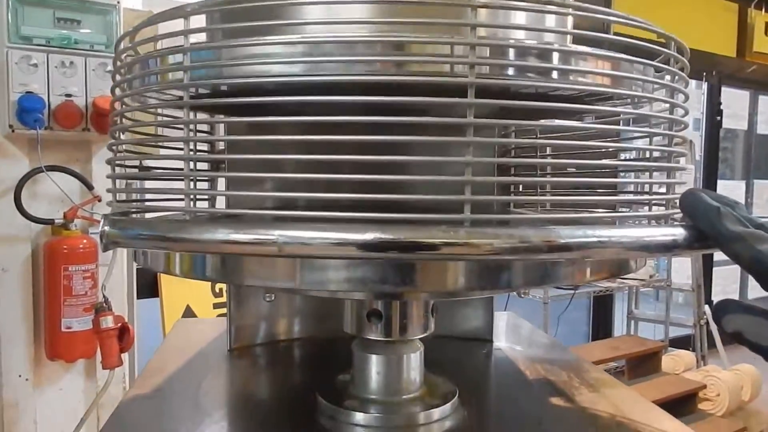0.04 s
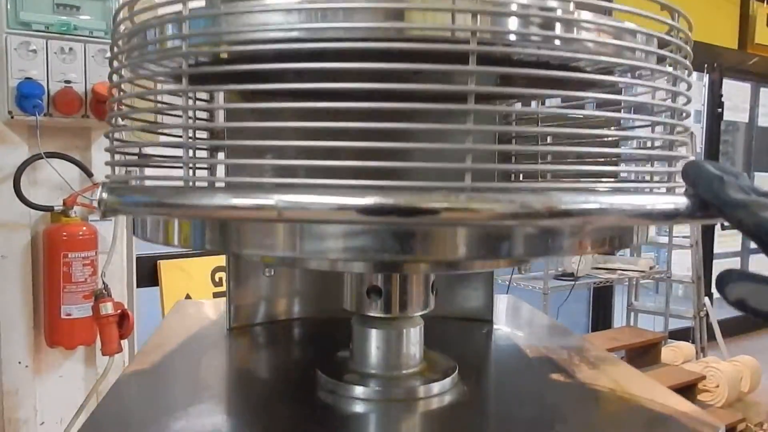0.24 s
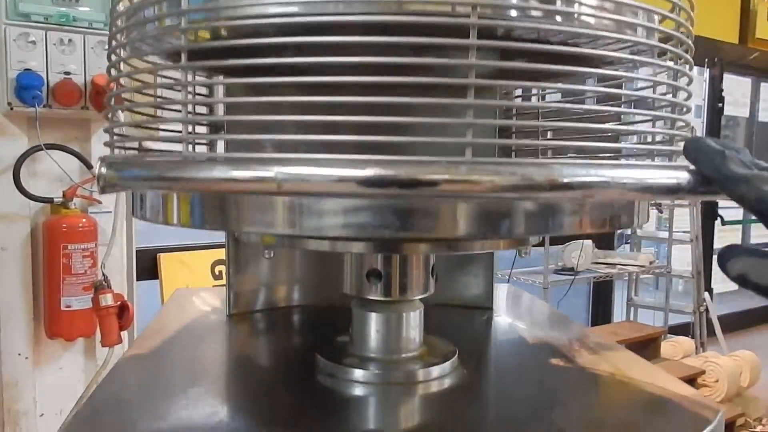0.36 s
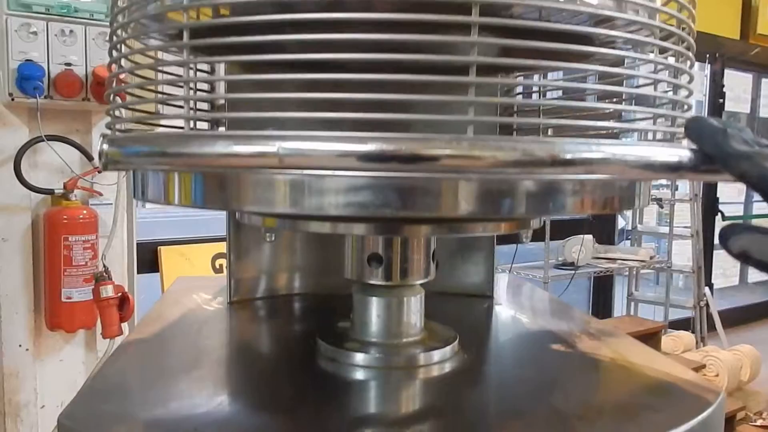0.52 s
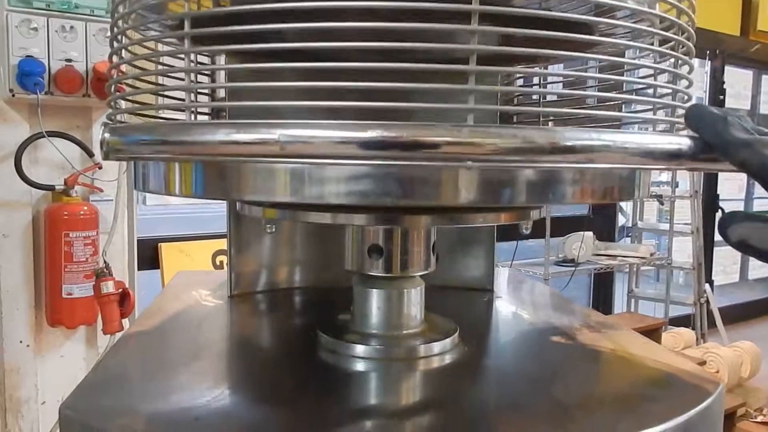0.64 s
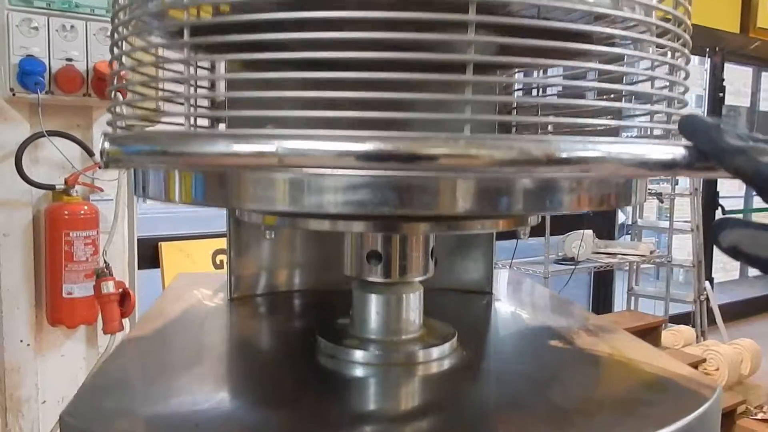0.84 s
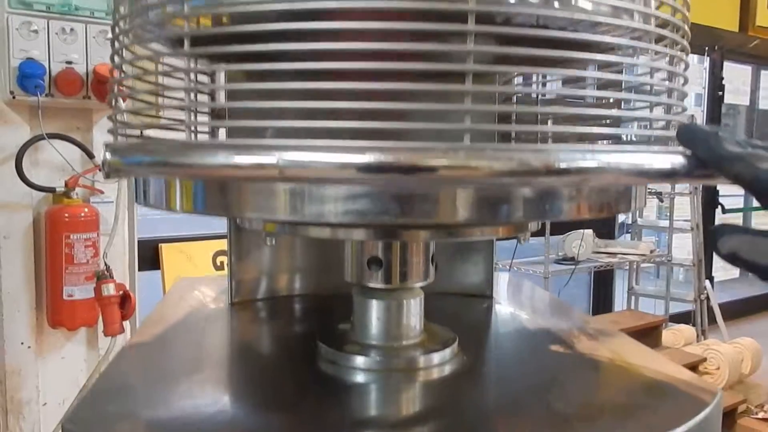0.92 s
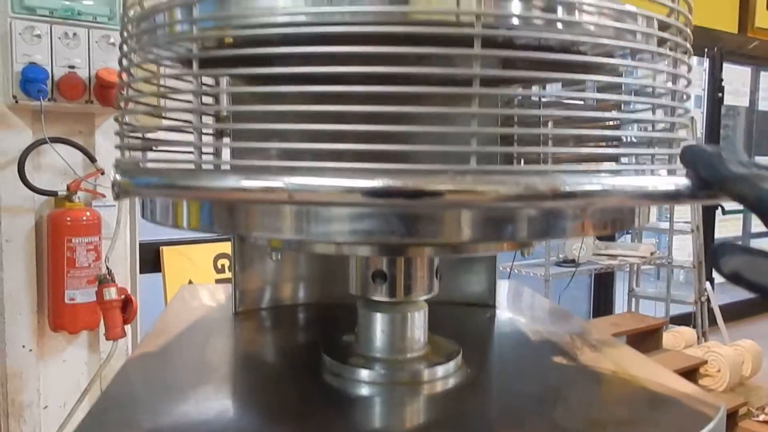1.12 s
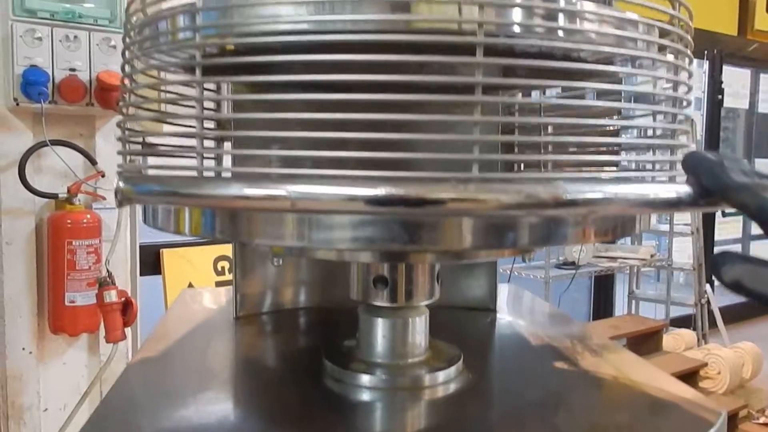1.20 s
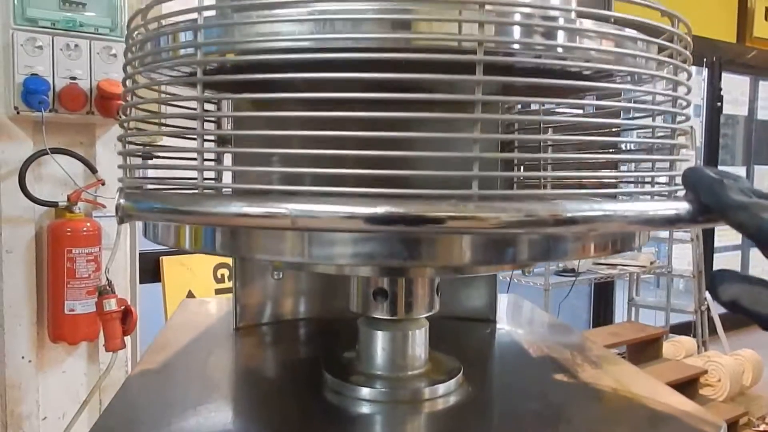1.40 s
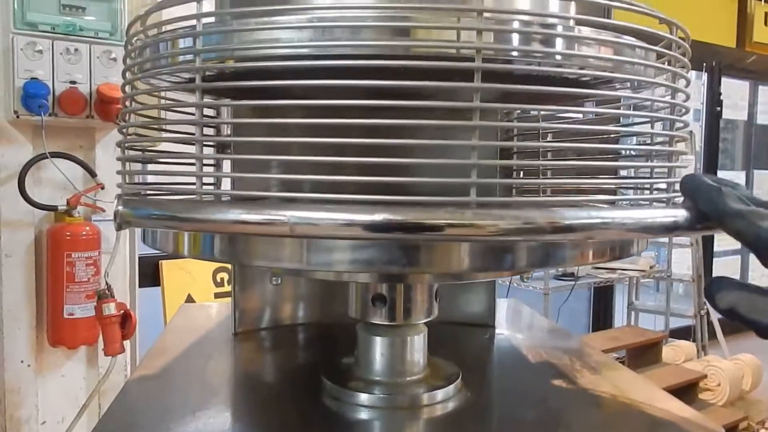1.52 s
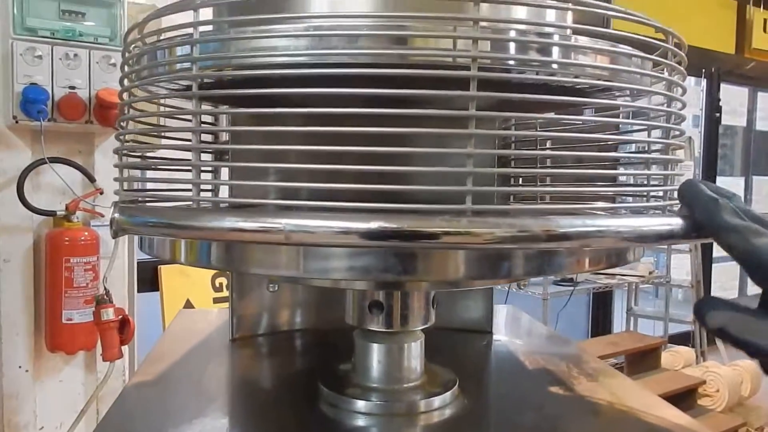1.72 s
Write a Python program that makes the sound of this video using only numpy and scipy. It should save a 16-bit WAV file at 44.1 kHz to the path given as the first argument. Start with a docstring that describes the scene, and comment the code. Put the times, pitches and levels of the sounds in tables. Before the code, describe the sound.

One metallic clunk from a dough mixer's wire guard lands at about 0.25 seconds, just after a soft motor hum and a very brief ticking scrape of the catch. The steel rattles and rings, echoing in a hard-walled kitchen and fading by about 1 second as the motor hum dies away. A quiet, wavering low drone and faint whines remain until about 1.75 seconds.

```python
"""In a hard-walled kitchen, the wire guard of a steel dough mixer is lifted while its motor hums.
The catch scrapes and ticks under friction, then lets go with one metallic clunk: a blow and its
rebounds rattle the panels, the housing and wires ring in their normal modes, and the walls
reverberate. The motor hum dies away, leaving a low wavering drone and faint whines over the room's air."""
import sys
import numpy as np
from scipy import signal
from scipy.fft import rfft, irfft
from scipy.io import wavfile

SR = 44100
rng = np.random.default_rng(int(sys.argv[2]) if len(sys.argv) > 2 else 0)


def wav_out(sig):
    """Save sig, one row per channel (or a flat mono array), as 16-bit PCM at SR to the path in sys.argv[1]."""
    wavfile.write(sys.argv[1], SR, np.round(np.clip(np.atleast_2d(sig).T, -1, 1) * 32767).astype(np.int16))


N = 77175
T = np.arange(N) / SR
HZ = np.fft.rfftfreq(N, 1 / SR)
ONSET = 1 - np.exp(-T / 0.0003)  # rise of a struck sound

# the blow of the clunk and its rebounds (time [s], relative level [dB], contact time [ms])
BLOWS = [(0.239, 12.5, 0.26), (.2421, -8.5, 0.054), (0.2433, -13.5, 0.033), (0.247, -4, 0.28),
         (0.2501, -0.5, 0.2), (0.2614, -9, 0.063)]
RELEASE_S = BLOWS[0][0]


def clunk():
    """Impact: each blow knocks and rattles the panels; longer contact passes less treble."""
    # clatter spectrum of the panels (frequency [Hz], relative level [dB])
    panel_spectrum = [(60, -15.5), (250, -25.5), (440, -16.5), (540, 4), (700, -19.5), (900, -6.5),
                      (1070, -19), (1270, 3), (1600, -11), (2700, 1), (3600, -10.5), (4900, -7.5),
                      (6000, -19.5), (10000, -19.5), (15500, -41)]
    knock = -amp(-14) * decay(T, t60=0.0027) * np.sin(2 * np.pi * 842 * T)
    out = np.zeros((2, N))
    for s, db, contact_ms in BLOWS:
        blow = knock + amp(10.5) * burst(panel_spectrum, t60=0.073)
        pole = np.exp(-1000 / (SR * contact_ms))
        add(out, s, amp(db) * signal.lfilter([1 - pole], [1, -pole], blow))
    add(out, RELEASE_S, housing() + wires())
    return out


def housing():
    """Free vibration: once struck, the steel housing rings in inharmonic normal modes."""
    # modes of the housing (frequency [Hz], level [dB], T60 [s])
    modes = [(149, -30, .6), (374, -36, 1.4), (498, -20, .42), (546, -22, .45), (563, -34, 1.0),
             (842, -24.5, .38), (888, -24, .5), (906, -18, .13), (1055, -37, .9), (1240, -24, .22),
             (1275, -19, .19), (1482, -29, .35), (1694, -26, .17), (2127, -29, .15), (2680, -25, .16),
             (2749, -38, .78), (2851, -37, .58), (3140, -39, .35), (3715, -46, .5), (4012, -46, .58),
             (4070, -41, .48), (4940, -45, .48)]
    return ringing(modes)


def wires(count=40):
    """Each wire of the guard rings at its own natural frequency, the higher ones more faintly."""
    low_hz, high_hz, tilt_db_per_octave, t60 = 1283, 5168, -10.5, 0.55
    hz = rng.uniform(low_hz, high_hz, count)
    db = -33 + tilt_db_per_octave * np.log2(hz / low_hz) + notch_db(hz)
    return ringing(zip(hz, db, np.full(count, t60))) / np.sqrt(count / 10)


def catch():
    """Sliding friction: the catch ticks and scrapes ever harder, then fades once it lets go."""
    # friction noise (frequency [Hz], relative level [dB])
    scrape_spectrum = [(200, -0.5), (1200, -1.5), (2700, 0.5), (5000, -7), (6500, -10), (9500, -12),
                       (15500, -26)]
    # small impacts as the catch slides (time [s], relative level [dB])
    ticks = [(0.187, -18), (0.2195, -4), (0.2214, 2), (0.2265, 1.5), (0.2288, 0.5), (0.2341, -6),
             (0.2398, -2)]
    # spectrum of one tick (frequency [Hz], relative level [dB])
    tick_spectrum = [(100, -19), (250, 9), (900, 0.5), (1200, 2.5), (2700, -3), (3800, -9.5), (4900, -8),
                     (6000, -22.5), (9000, -18), (15500, -38)]
    start_s = 0.1951
    press = np.clip((T - start_s) / (RELEASE_S - start_s), 0, 1)
    fade = decay(np.maximum(T - RELEASE_S, 0), t60=0.35)
    out = amp(-42) * press * fade * noise(notched_gain(scrape_spectrum))
    for s, db in ticks:
        add(out, s, amp(db + 0.5) * burst(tick_spectrum, t60=0.07))
    return out


def kitchen():
    """Reverberation: dense reflections of the clunk build up and decay, slowest in the bass."""
    # spectrum of the reverberation (frequency [Hz], relative level [dB])
    room_spectrum = [(35, -38), (60, -11.5), (204, -4), (276, -18.5), (364, -4.5), (458, -12), (491, -1),
                     (695, -12), (855, -9), (982, -9), (1450, -15), (1630, -25), (2110, -16.5), (2470, -21),
                     (2780, -15), (2980, -21.5), (4840, -25), (6230, -41), (15000, -70)]
    # reverberation time (frequency [Hz], T60 [s])
    room_t60 = [(70, 2.2), (180, 2.48), (400, 1.374), (600, 1.19), (1100, 1.097), (2000, 0.73),
                (4500, 0.58), (8000, 0.53), (14000, 0.48)]
    hz, t, bands = signal.stft(noise(notched_gain(room_spectrum)), SR, nperseg=1024, noverlap=768)
    bands = bands * decay(t, read(room_t60, hz)[:, None])
    tail = signal.istft(bands, SR, nperseg=1024, noverlap=768)[1][:, :N]
    build_up = 1 - np.exp(-T / 0.0086)
    out = np.zeros((2, N))
    add(out, RELEASE_S, amp(14) * unit(tail * build_up) / np.sqrt(N))
    return out


def motor():
    """Rotation gives hum lines and gear noise; both decay exponentially from just before the clunk."""
    # line spectrum of the hum (frequency [Hz], level [dB])
    hum_lines = [(99.6, -48), (145, -50), (199.6, -39.5), (247, -55), (299.8, -47.5), (584, -53),
                 (614.5, -47.5), (877, -59), (1172, -68), (1204, -69)]
    # noise bands of the running gears (frequency [Hz], width [Hz], level [dB])
    gear_bands = [(1735, 60, -66.5), (2730, 90, -66.5), (4014, 30, -77), (6630, 90, -76)]
    # broadband rush of the motor (frequency [Hz], relative level [dB])
    rush_spectrum = [(60, -1), (180, -2.5), (350, -15.5), (600, -7.5), (750, -21.5), (1200, -19),
                     (2800, -30), (5500, -37), (9000, -53.5), (15000, -65)]
    off_s = 0.15
    hum = sum(amp(db) * np.sqrt(2) * sine(hz) for hz, db in hum_lines)
    gears = sum(amp(db) * narrowband(hz, width) for hz, width, db in gear_bands)
    rush = amp(-43) * noise(amp(read(rush_spectrum, HZ)))
    since_off = np.maximum(T - off_s, 0)
    return hum * decay(since_off, t60=2.2) + (gears + rush) * decay(since_off, t60=0.2)


def drone(hz=59.5):
    """Amplitude modulation: a low tone wavers in level."""
    # envelope of the drone (time [s], level [dB])
    envelope = [(0, -77), (.18, -42), (.4, -44.5), (.55, -48.5), (.68, -37), (.76, -44), (.82, -57),
                (.9, -64), (.97, -38), (1.05, -44), (1.1, -56), (1.2, -44.5), (1.28, -47.5), (1.36, -40.5),
                (1.45, -48), (1.55, -38), (1.66, -45.5), (1.75, -39.5)]
    return amp(np.interp(T, *np.transpose(envelope))) * np.sqrt(2) * sine(hz)


def room_modes():
    """Resonance: the room booms in narrow low bands that fade slowly."""
    # room resonances (frequency [Hz], width [Hz], start level [dB], end level [dB])
    booms = [(101, 14, -46, -63), (161, 6.7, -49, -60.5), (203, 3.6, -54, -55), (247, 14, -50, -63)]
    return sum(amp(np.linspace(start_db, end_db, N)) * narrowband(hz, width)
               for hz, width, start_db, end_db in booms)


def whines():
    """Narrowband noise is heard as pitch: faint whines swell and fade under Gaussian envelopes."""
    # whines (peak time [s], time spread [s], frequency [Hz], width [Hz], level [dB])
    swells = [(.8, .16, 1150, 85, -58.5), (1.1, .6, 1045, 70, -69), (1.45, .45, 1775, 70, -71),
              (1.635, .04, 1775, 45, -63.5), (1.45, .5, 3670, 80, -83)]
    return sum(amp(db) * np.exp(-((T - s) / spread) ** 2 / 2) * narrowband(hz, width)
               for s, spread, hz, width, db in swells)


def room_air():
    """Ambient noise: a steady diffuse field, strongest in the bass."""
    # spectrum of the room's air (frequency [Hz], relative level [dB])
    air_spectrum = [(15, -54), (25, -22.5), (38, -15.5), (64, -10), (86, -14.5), (204, -22), (281, -29),
                    (359, -26.5), (433, -29), (469, -33), (1570, -40.5), (1800, -41.5), (2560, -47.5),
                    (3720, -48), (15500, -75.5)]
    return amp(-49.5) * noise(amp(read(air_spectrum, HZ)), diffuse=True)


def ringing(modes):
    """Superposition of damped modes (frequency [Hz], level [dB], T60 [s])."""
    return sum(amp(db) * decay(T, t60) * sine(hz) for hz, db, t60 in modes) * ONSET


def burst(spectrum, t60):
    """Modal overlap: a crowd of short-lived resonances merges into decaying noise of energy 1."""
    return unit(noise(notched_gain(spectrum)) * decay(T, t60) * ONSET) / np.sqrt(N)


def narrowband(hz, width):
    """Noise filtered by one narrow resonance, heard through the room."""
    return noise(1 / (1 + ((HZ - hz) / width) ** 2) ** 2, diffuse=True)


def noise(gain, diffuse=False):
    """Shaped stereo noise of rms 1; a diffuse field is less coherent between left and right."""
    # left-right likeness of the machine's sound (frequency [Hz], correlation [0-1])
    machine_correlation = [(50, .997), (1000, .997), (2400, .985), (6000, .89), (15000, .55)]
    # left-right likeness of the room's air (frequency [Hz], correlation [0-1])
    air_correlation = [(60, 0.85), (180, .8), (550, 0.47), (1650, 0.83), (5000, .4), (15000, .15)]
    correlation = np.clip(read(air_correlation if diffuse else machine_correlation, HZ), 0, 0.999)
    mid, side = rfft(rng.standard_normal((2, N)))
    mid, side = mid * np.sqrt(1 + correlation), side * np.sqrt(1 - correlation)
    return unit(irfft(np.array([mid + side, mid - side]) * gain, N))


def notched_gain(spectrum):
    """Gain per frequency bin of a spectrum with the treble notch cut into it."""
    return amp(read(spectrum, HZ) + notch_db(HZ))


def notch_db(hz, centre_hz=2512, width_hz=40):
    """A narrow Gaussian gap in the treble of the metal sounds."""
    return -24 * np.exp(-((hz - centre_hz) / width_hz) ** 2)


def sine(hz):
    """Simple harmonic motion of random phase."""
    return np.sin(2 * np.pi * (hz * T + rng.random()))


def decay(t, t60):
    """Exponential damping: the gain falls by 60 dB in t60 seconds."""
    return amp(-60 * t / t60)


def amp(db):
    """Decibels to gain."""
    return 10 ** (np.asarray(db) / 20)


def unit(x):
    """Normalisation to rms 1."""
    return x / np.sqrt(np.mean(x ** 2) + 1e-20)


def read(points, hz):
    """Interpolation on a log-frequency axis."""
    f, value = np.transpose(points)
    return np.interp(np.log(hz + 1), np.log(f), value)


def add(mix, s, sound):
    """Superposes a sound on the mix at time s."""
    part = mix[..., round(s * SR):]
    part += sound[..., :part.shape[-1]]


def scene():
    """The sources sum; a level difference sets all but the top treble slightly to the left."""
    # stereo balance (frequency [Hz], left boost and right cut [dB])
    balance = [(700, 0.99), (3000, .7), (5500, 0.48), (8500, -1), (14000, 0)]
    mix = catch() + clunk() + kitchen() + motor() + drone() + room_air() + room_modes() + whines()
    balance_db = read(balance, np.fft.rfftfreq(2 * N, 1 / SR))
    channel_gain = amp(np.outer([1, -1], balance_db))
    return irfft(rfft(mix, 2 * N) * channel_gain)[:, :N]


def record(dry):
    """Band limiting: a high-pass, short fades at both ends and a steep low-pass."""
    low_cut_hz, high_cut_hz, fade_s = 30, 15740, 0.012
    wet = signal.sosfilt(signal.butter(2, low_cut_hz, "high", fs=SR, output="sos"), dry)
    ramp = np.minimum(np.minimum(T, T[::-1]) / fade_s, 1)
    wet = wet * np.sin(np.pi / 2 * ramp) ** 2
    low_pass = signal.firwin(511, high_cut_hz, window=("kaiser", 9), fs=SR)
    return signal.oaconvolve(wet, low_pass[None], "same")


dry = scene()
out = record(dry)
wav_out(out)
```